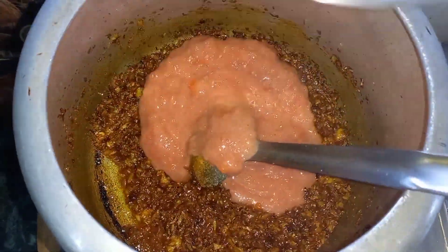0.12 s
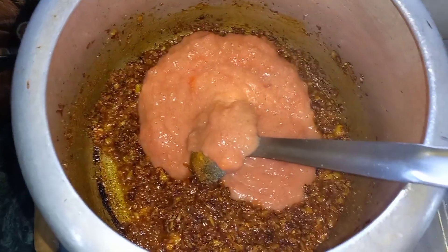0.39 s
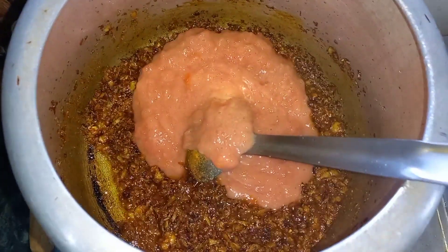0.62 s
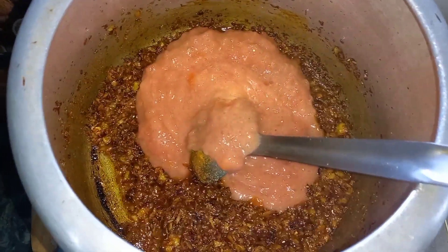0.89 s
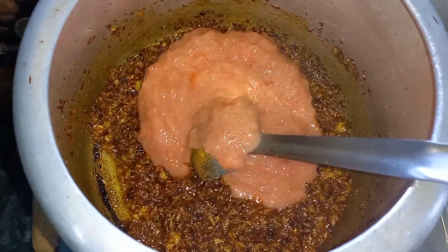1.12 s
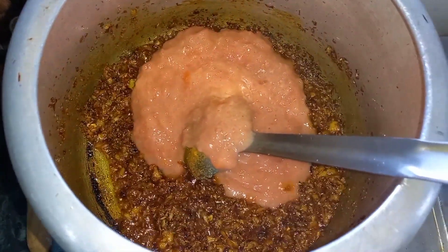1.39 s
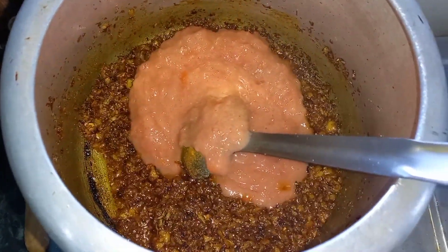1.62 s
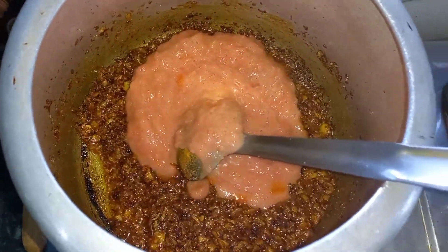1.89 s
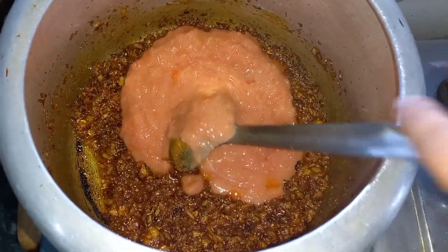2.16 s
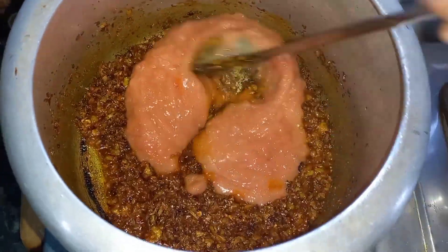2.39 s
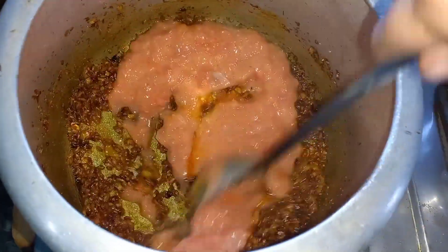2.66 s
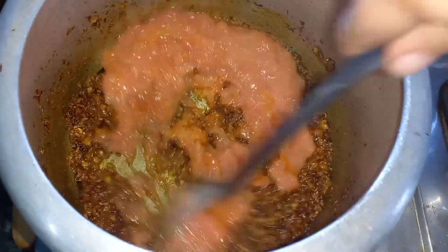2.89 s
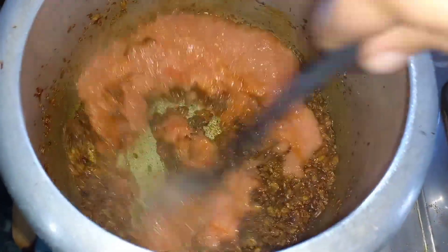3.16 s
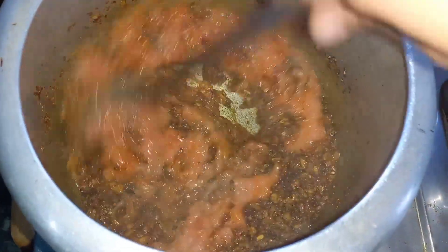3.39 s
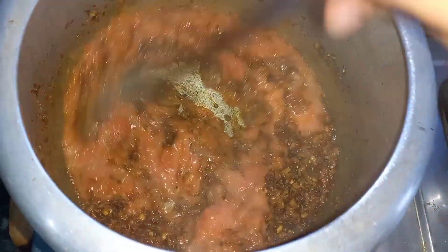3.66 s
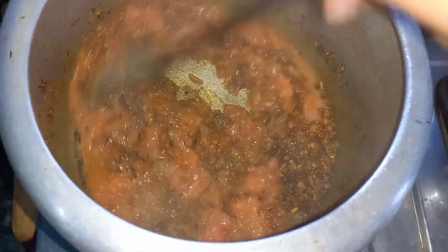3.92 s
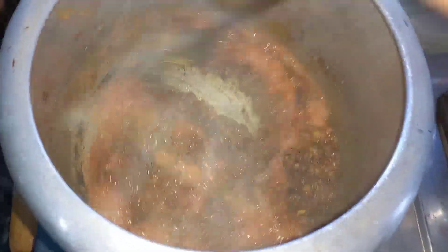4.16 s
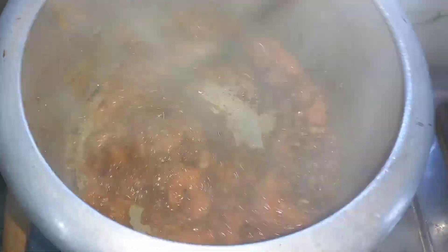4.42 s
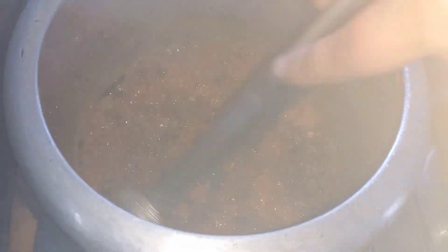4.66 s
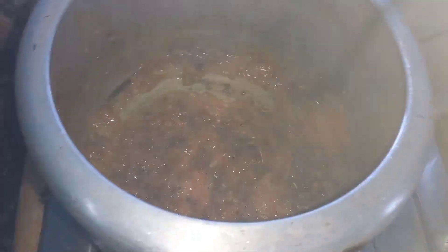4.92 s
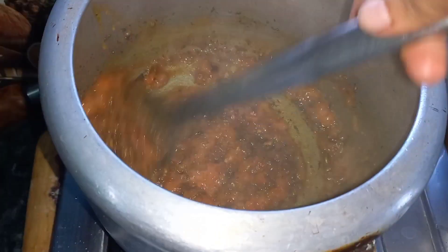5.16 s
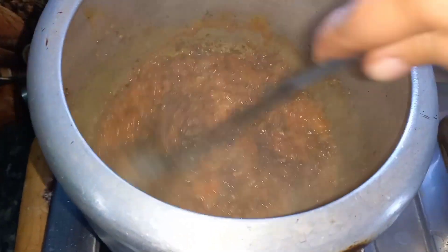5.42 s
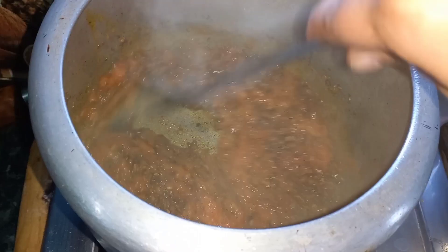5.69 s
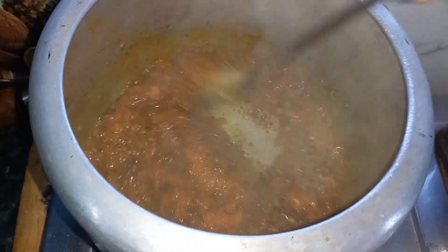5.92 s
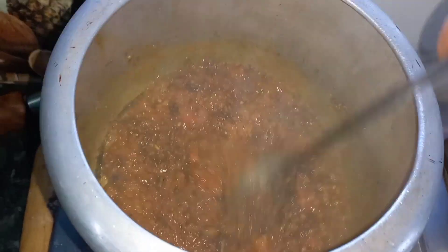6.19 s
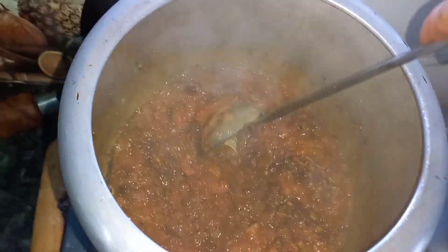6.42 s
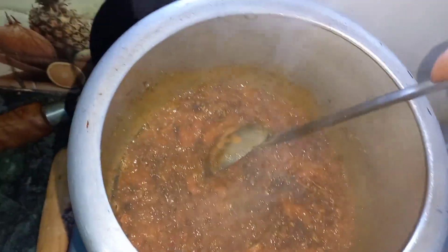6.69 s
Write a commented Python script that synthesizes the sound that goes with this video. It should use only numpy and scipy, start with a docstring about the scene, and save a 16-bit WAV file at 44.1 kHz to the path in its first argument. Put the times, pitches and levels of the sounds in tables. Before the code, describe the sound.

Close above a deep metal pot in a small kitchen, puree sizzles in hot oil with brisk crackle and bright, tiny spits. A bowl is set down nearby with a brief dull rattle. Then a spoon begins stirring: the sizzle jumps up, denser and smoother, with a few short knocks on the pot and hollow bubbling, easing slightly at the end. Handheld stereo microphone, the crisp treble leaning left.

```python
"""Tomato puree frying in a deep pot

Puree fries in hot oil; a spoon stirs it and the sizzle flares as wet food meets the hot base.
Steam bubbles are noise under flurries of random bursts, and spits are short snaps amid a spray of noise.
Larger bubbles are burst noise through the resonances of the pot; plops, a bowl set down nearby and
the spoon on the pot are struck modes with a crack, and a low rumble lies beneath.
Two microphone ports of a hand-held camera listen from above, the left one facing the pot."""
import sys
import numpy as np
from scipy import signal
from scipy.fft import rfft, irfft, next_fast_len
from scipy.io import wavfile
from scipy.ndimage import uniform_filter1d, map_coordinates

SR = 44100
rng = np.random.default_rng(int(sys.argv[2]) if len(sys.argv) > 2 else 0)


def master(y):
    """Save y as 16-bit WAV."""
    cut = np.clip(np.atleast_2d(y).T, -1, 1)
    pcm = np.round(cut * 32767)  # scale
    wavfile.write(sys.argv[1], SR, pcm.astype(np.int16))


def magnitude_from_level(level_db):
    """Linear magnitude for a level in decibels (20 dB per decade)."""
    exponent = np.asarray(level_db, float) / 20
    return 10 ** exponent


N = 300321  # samples

# Strength of the frying, gentle at rest and flaring once the spoon turns the puree under: time_s, fizz_db
SIZZLE_LEVEL = [(0.0, -31.5), (0.15, -30.5), (0.28, -31.5), (0.34, -33), (0.355, -31.5), (0.44, -36),
                (0.48, -34), (0.52, -30.5), (0.562, -36), (0.575, -36), (0.6, -28.5), (0.62, -34),
                (0.65, -34), (0.75, -35), (1.3, -33), (1.8, -31.5), (2.1, -31.5), (2.375, -32),
                (2.40, -32.5), (2.43, -26.5), (2.55, -26.5), (2.63, -28.5), (2.7, -25.5), (2.82, -27),
                (2.86, -23.5), (2.92, -25), (3.2, -27), (3.5, -25.5), (4.72, -28), (4.78, -30.5),
                (5.03, -30), (5.15, -27.5), (5.42, -28), (5.53, -30), (5.75, -27.5), (5.95, -28.5),
                (6.07, -27.5), (6.3, -31), (6.5, -30.5), (6.81, -34)]
# Balance of bubble sizes: time_s, fine_over_medium_db, coarse_over_medium_db
BUBBLE_SIZES = [(0.0, -4, 3.5), (0.565, 5.5, 8.5), (0.575, 3.5, 4.5), (1.5, 2.5, 3), (2.3, -2, 2),
                (2.6, -0.5, 2.5), (3.4, 2, 1.5), (4.4, 3, 4), (4.7, 3.5, 5.5), (5.7, 1.5, 4.5),
                (6.81, 4.5, 6)]
# Few bubbles stand out, a wet even boil smooths them: time_s, depth_factor
FLURRY_DEPTH = [(0, 0.66), (1, 0.72), (2.3, 0.98), (2.5, 0.28), (3.5, 0.43), (4.5, 0.35), (5.5, 0.34),
                (6.81, 0.32)]
# Spectrum of the tiny steam bubbles: frequency_hz, level_db (per Hz)
FIZZ_SPECTRUM = [(1500, -25.5), (2400, -13), (2850, -9), (3200, -6), (3600, -4.5), (4500, -3.5), (5000, -1),
                 (5450, 0), (5950, -0.5), (6400, -1.5), (7600, 4), (8200, 2.5), (8560, 6.5), (9000, 3),
                 (10500, 2.5), (12600, 4), (14500, 1.4), (15800, -1.5)]
# Aim of the camera: time_s, left_minus_right_db (added to the fizz),
# right_delay_ms (of hum, gurgle and rumble together)
CAMERA_AIM = [(0.0, -2, -0.05), (0.76, 2.5, -0.051), (1.82, -1, -0.057), (2.65, 5, 0.06), (4.2, 1.5, 0.11),
              (5.2, 1, -0.014), (5.8, 1, 0.023), (6.81, 0.5, -0.14)]

# Hum of the air in the pot: time_s, hum_db
HUM_LEVEL = [(0.0, -38), (0.36, -37.5), (0.5, -39.5), (1.3, -40), (1.75, -40.5), (2.3, -39.5),
             (2.47, -34.5), (2.6, -40), (2.84, -34), (2.92, -42), (3.4, -39.5), (4.3, -41.5), (4.73, -40.5),
             (4.78, -34.5), (4.85, -39.5), (4.93, -40), (5.05, -45), (5.11, -35.5), (5.17, -35),
             (5.24, -39.5), (6.2, -40.5), (6.81, -43)]
# Lowest resonances of the air in the pot: centre_hz, width_hz, level_db
CAVITY = [(306, 55.5, -8), (360.4, 37.4, -2.5), (443, 59.3, 1.5), (503, 105, -9.5)]
# Larger bubbles: time_s, level_db, low_db (added below the split)
GURGLE_LEVEL = [(0, -38, 0.5), (0.5, -39, 1), (0.62, -40.5, 0), (1.0, -39, 0), (1.4, -41, 0.5),
                (1.8, -41, 2), (2.37, -41.5, 0), (2.46, -35.5, -0.5), (2.62, -38, 0.5), (2.82, -34, -1),
                (2.93, -36.5, 0.5), (3.5, -35, -0.5), (4.6, -35.5, -1.5), (4.78, -37.5, 1),
                (4.86, -35.5, -7), (5.0, -36.5, 0), (5.27, -34.5, -4), (5.5, -37.5, -1), (5.95, -36, 0),
                (6.3, -38.5, -0.5), (6.81, -41.5, -3.5)]
# Higher pot resonances as the camera hears them before the stirring: centre_hz, width_hz, level_db
WALLS_RESTING = [(693, 400, -8), (1136, 19, 2.5), (1340, 740, -9), (1906, 88, 2.5), (2102, 71, 4.5),
                 (2410, 400, -3), (3430, 880, -4)]
# The same during the first strokes: centre_hz, width_hz, level_db
WALLS_STIRRED = [(690, 1270, -7), (1152, 43, 3.5), (1292, 154, -0.5), (1505, 570, 0), (1993, 290, 4),
                 (2580, 310, -0.5), (3480, 1400, -4.5)]
# The same late in the stirring: centre_hz, width_hz, level_db
WALLS_LATE = [(707, 200, -9), (1268, 78, 1), (1464, 53, -4.5), (2040, 310, 0), (2505, 170, 1.5),
              (3360, 900, -3)]
# Which of these three sets is heard, blending in between: time_s, set_number (0 to 2)
WALLS_VIEW = [(0, 0.12), (2.3, 0.094), (2.5, 1.06), (4.1, 0.94), (4.8, 1.77), (6.81, 1.53)]
# Rumble of the flame and of the hand on the camera: time_s, rumble_db
RUMBLE_LEVEL = [(0.0, -47.5), (0.4, -57), (1.12, -52), (1.27, -49.5), (1.42, -54.5), (2.15, -56.5),
                (2.5, -49), (2.66, -42.5), (2.85, -52), (2.93, -48), (2.98, -43), (3.03, -49), (3.6, -50),
                (4.55, -49), (4.63, -48), (4.7, -49), (4.85, -55.5), (5.45, -56.5), (6.0, -47),
                (6.3, -49.5), (6.55, -51), (6.81, -50.5)]
# Spectrum of that rumble: frequency_hz, level_db (per Hz)
RUMBLE_SPECTRUM = [(25, -43), (45, -27), (70, -7), (90, 2.5), (104, 4), (120, -2.5), (150, -4), (200, -5),
                   (280, -15.5), (400, -28), (700, -80)]

# The marked oil spits: start_s, left_level_db, left_minus_right_db, pitch_hz
MARKED_SPITS = [(0.4179, -9, 9, 11400), (0.4967, -6, 10, 9800), (0.5226, -8, 11, 11700),
                (0.5555, -10, 6, 6500), (0.5685, -7, 14, 11100), (0.5915, -6, 13, 11800),
                (0.6526, -7, 15, 11900), (1.2804, -9, 11, 11400), (1.4368, -9, 9, 11200),
                (1.6127, -9, 10, 10400), (1.815, -9, 10, 7000), (2.0334, -9, 11, 10900),
                (2.1008, -5, 16, 11500), (2.2662, -8, 13, 8500), (2.5264, -4, 11, 9400),
                (2.6796, -7, 13, 9800), (4.6821, -7, 10, 9300), (5.8347, -7, 11, 11500)]
# Mean of the lesser spits: left_level_db, left_minus_right_db, pitch_hz
SMALL_SPIT = (-12.5, 11, 11300)
# Random scatter around that mean: left_level_db, left_minus_right_db, pitch_hz
SMALL_SPIT_SCATTER = (1.2, 2.5, 1600)

# Touches of the bowl: start_s, level_db (before trim), thud_db
BOWL_BLOWS = [(1.158, -18, -2), (1.173, -28, 2), (1.185, -28, -4), (1.211, -21.5, -9), (1.222, -28, -1),
              (1.237, -21, -11), (1.247, -29, 0), (1.262, -32, 2), (1.292, -34, 1)]
# Modes of the bowl: pitch_hz, level_db, t60_s
BOWL_MODES = [(180, -7, .05), (300, -8, .04), (445, -9, .025), (600, -11, .04), (790, -8, .09),
              (1040, -9, .03), (1240, -9, .02), (1400, 0, .04), (1510, -2, .025), (1900, -12, .025),
              (2370, 0, .045)]
# Spoon against the pot: start_s, level_db (before trim), thud_db
SPOON_BLOWS = [(2.48, -27, 4.5), (2.694, -18, -9), (2.979, -19, -3), (3.515, -11, -20), (4.6805, -16, 3)]
# Modes of the loaded pot under a blow: pitch_hz, level_db, t60_s
POT_MODES = [(208, -3, 0.025), (393, 10, 0.015), (700, 1, 0.018), (842, -12, 0.12), (1230, 2.5, 0.02),
             (2300, -14, 0.03), (3150, -10, 0.015), (3700, -2, 0.03), (4200, -5, 0.018)]
# The first stroke rocks the pot on its stand: centre_s, level_db, spread_s
SHOVE = (2.67, -45.5, .06)
# Low tones of the stand: pitch_hz, level_db
STAND = [(106, 3), (146, -5)]
# Big bubbles burst and sound the air in the pot: start_s, level_db (before trim), thud_db
PLOP_BLOWS = [(3.957, -23, 1), (4.803, -23, -1), (4.868, -27, -1), (4.91, -24, 0)]
# Modes of that air: pitch_hz, level_db, t60_s
PLOP_MODES = [(366, -3, 0.033), (453, 0, 0.051)]

# How alike the two ports hear: frequency_hz, likeness (1 is identical)
PORT_LIKENESS = [(25, 0.21), (90, 1), (125, 1), (190, 0.61), (300, 1), (450, 0.87), (800, 0.63),
                 (1150, 0.36), (1500, 0.49), (2000, 0.29), (2400, 0.24), (3000, 0.073), (15000, 0.11)]
# Level difference of the ports: frequency_hz, left_minus_right_db
PORT_LEAN = [(60, 3), (100, 1), (160, 5.5), (270, 1.5), (450, 4), (740, 7), (1220, 0.5), (2010, 1),
             (3330, 3.5), (5300, 7.5), (6500, 10.5), (8500, 8), (10500, 5), (13000, 9), (15500, 12)]
# Phase by which the left port leads: frequency_hz, lead_rad
PORT_LEAD = [(60, 0.64), (430, 0.54), (800, 0.61), (1400, 0.074), (2000, 1.63), (3000, 1.7), (6000, 0)]


def along(points, hz):
    """Reads (frequency, value) points on a log frequency axis."""
    f, v = np.transpose(points)
    return np.interp(np.log(hz + 1), np.log(f + 1), v)


def curves(rows):
    """Draws one value per sample for each column after the time."""
    s, *columns = np.transpose(rows)
    return [np.interp(np.arange(N) / SR, s, column) for column in columns]


def filtered(x, response):
    """Multiplies the spectrum of x by a complex response of frequency."""
    m = next_fast_len(N + SR // 2)
    return irfft(rfft(x, m) * response(np.fft.rfftfreq(m, 1 / SR)), m)[..., :N]


def below(corner_hz, steepness):
    """A smooth low-pass response; a higher steepness falls faster."""
    return lambda hz: 1 / (1 + (hz / corner_hz) ** steepness)


def resonances(modes):
    """Causal response of damped resonators side by side, every second one inverted."""
    def response(f):
        total = 0
        for k, (centre, width, db) in enumerate(modes):
            damping = 1j * f * width
            total = total + (-1) ** k * magnitude_from_level(db) * damping / (centre ** 2 - f ** 2 + damping)
        return total
    return response


def throb(lo_hz, hi_hz, channels=1):
    """A random curve of rms 1 that swings lo to hi times a second."""
    def band(hz):
        return 1 / (1 + (lo_hz / (hz + 0.091)) ** 2) / (1 + (hz / hi_hz) ** 2)
    swing = filtered(rng.standard_normal((channels, N)), band)
    return swing / swing.std()


def patches(shape, bins, frames):
    """A random field of rms 1, smooth over so many frequency bins and time frames."""
    field = uniform_filter1d(rng.standard_normal(shape), size=bins, axis=0)
    field = uniform_filter1d(field, size=frames, axis=1)
    return field / field.std()


def bursts(per_s, spread_db, life_s, share):
    """Envelope of bubble bursts, sudden and dying fast, over a steady share; mean power 1."""
    size_db = spread_db * np.minimum(rng.exponential(size=N), 3)
    hits = (rng.random(N) < per_s / SR) * magnitude_from_level(size_db) ** 2
    power = signal.lfilter([1], [1, -np.exp(-1 / (life_s * SR))], hits)
    share = np.clip(share, 0, 1)
    return np.sqrt(1 - share + share * power / power.mean())


def ports(envelope, response, patchy_db, notes_db):
    """Patchy noise under an envelope as two partly alike ports hear it; their mean has rms 1."""
    z = signal.stft(rng.standard_normal((2, N + 512)), nperseg=512)[2]
    shape = z.shape[1:]
    gain_db = patchy_db * patches(shape, bins=30, frames=4)  # broad patches
    gain_db = gain_db + notes_db * patches(shape, bins=2, frames=4)  # brief bubble notes
    # echoes off the pot walls draw peaks and dips that drift as the camera moves
    gain_db = gain_db + 1.1 * patches(shape, bins=3, frames=70)
    pair = envelope * signal.istft(z * magnitude_from_level(gain_db), nperseg=512)[1][:, :N]

    def spread(hz):
        turn = np.arccos(np.clip(along(PORT_LIKENESS, hz), -1, 1)) / 2
        return [np.cos(turn), np.sin(turn)]

    def lean(hz):
        level = magnitude_from_level(np.outer([.5, -.5], along(PORT_LEAN, hz)))
        return level * np.exp(1j * np.outer([.5, -.5], along(PORT_LEAD, hz)))

    mid, side = filtered(pair, spread)
    out = filtered(np.array([mid + side, mid - side]), lambda hz: response(hz) * lean(hz))
    return out / out.mean(axis=0).std()


def fizz_colour(hz):
    """Spectrum of the tiny steam bubbles, shared by the sizzle and the spray."""
    return magnitude_from_level(along(FIZZ_SPECTRUM, hz))


def sizzle():
    """Steam bubbles burst through the oil in flurries; medium, fine and coarse ones swing on their own."""
    fizz_db, = curves(SIZZLE_LEVEL)
    fine_db, coarse_db = curves(BUBBLE_SIZES)
    aim_db, _ = curves(CAMERA_AIM)
    depth, = curves(FLURRY_DEPTH)
    flurry = magnitude_from_level(1.5 * depth * throb(20, 21) + 0.3 * throb(3.3, 5.5))
    envelope = flurry * bursts(900, spread_db=-1.5, life_s=0.0017, share=0.31)
    fizz = ports(envelope, fizz_colour, patchy_db=1.25, notes_db=1.5)
    # each port faces other bubbles
    fizz = fizz * magnitude_from_level(0.59 * throb(12.0, 28, channels=2) + np.outer([.5, -.5], aim_db))
    fine = filtered(fizz, lambda hz: 1 / (1 + (10800 / (hz + 1)) ** 8))
    coarse = filtered(fizz, below(6700, 8))
    medium = fizz - fine - coarse
    own = magnitude_from_level(1.25 * depth * throb(24, 30, channels=3))
    mix = medium * own[0] + fine * own[1] * magnitude_from_level(fine_db) + coarse * own[2] * magnitude_from_level(coarse_db)
    return magnitude_from_level(fizz_db) * mix


def hum():
    """Bubble bursts set the lowest resonances of the air in the pot sounding."""
    def cavity(hz):
        return resonances(CAVITY)(hz) * hz / (hz + 200) * below(800, 4)(hz)
    level_db, = curves(HUM_LEVEL)
    envelope = magnitude_from_level(0.66 * throb(9.1, 10)) * bursts(70, spread_db=-2, life_s=0.0026, share=0.23)
    return magnitude_from_level(level_db) * ports(envelope, cavity, patchy_db=0.0, notes_db=-1.3)


def gurgle():
    """Larger bubbles excite the higher pot resonances, which pass from one set to the next."""
    split_hz = 1150
    level_db, low_db = curves(GURGLE_LEVEL)
    view, = curves(WALLS_VIEW)
    bubbles = magnitude_from_level(0.32 * throb(1.5, 7.8)) * bursts(150, spread_db=3.0, life_s=0.0055, share=0.25)
    mix = 0
    for k, walls in enumerate([WALLS_RESTING, WALLS_STIRRED, WALLS_LATE]):
        fade = np.clip(1 - abs(view - k), 0, 1) ** .5
        mix = mix + fade * ports(bubbles, resonances(walls), patchy_db=1.0, notes_db=2.0)
    mix = mix + (magnitude_from_level(low_db) - 1) * filtered(mix, below(split_hz, 12))
    return magnitude_from_level(level_db) * mix


def rumble():
    """The flame and the hand on the camera rumble: low noise that swells unsteadily."""
    level_db, = curves(RUMBLE_LEVEL)
    noise = ports(magnitude_from_level(0.7 * throb(4.1, 7.3)), lambda hz: magnitude_from_level(along(RUMBLE_SPECTRUM, hz)),
                  patchy_db=1.0, notes_db=2.3)
    return magnitude_from_level(level_db) * noise


def simmer():
    """Hum, gurgle and rumble together, the right port shifted in time as the camera's aim drifts."""
    left, right = hum() + gurgle() + rumble()
    late = curves(CAMERA_AIM)[1] * SR / 1000  # ms to samples
    return np.array([left, map_coordinates(right, [np.arange(N) - late], mode="nearest")])


def small_spits():
    """Lesser spits at random times, louder when the fizz is above its opening level."""
    per_s, follow = 9, 0.35  # follow: dB gained for each dB of fizz
    count = round(per_s * N / SR)
    start_s = rng.random(count) * N / SR
    traits = np.array(SMALL_SPIT) + np.array(SMALL_SPIT_SCATTER) * rng.standard_normal((count, 3))
    fizz_db = np.interp(start_s, *np.transpose(SIZZLE_LEVEL))
    traits[:, 0] += follow * (fizz_db - SIZZLE_LEVEL[0][1])
    return np.column_stack([start_s, traits])


def spits():
    """Drops of water explode in the oil: a snap of about two cycles amid a short spray of noise."""
    half = SR // 50  # samples on either side of the snap
    t = np.arange(-half, half) / SR
    snaps, spray = np.zeros((2, N + SR)), np.zeros((2, N + SR))
    snap_shape = .85 * np.exp(-(t / .00009) ** 2)
    spray_shape = magnitude_from_level(-17) * np.exp(-np.abs(t - .002) / 0.0018)
    for s, db, pan_db, hz in np.vstack([MARKED_SPITS, small_spits()]):
        at = round(s * SR)
        size = magnitude_from_level([[db], [db - pan_db]])
        snaps[:, at:at + len(t)] += size * snap_shape * np.cos(2 * np.pi * hz * t)
        spray[:, at:at + len(t)] += size * spray_shape * rng.standard_normal((2, len(t)))
    return snaps[:, half:][:, :N] + filtered(spray[:, half:][:, :N], fizz_colour)


def knocks(blows, modes, level_db, crack_db, crack_s, size):
    """Blows crack and ring decaying modes, roughened by rattling; thud favours crack and low modes."""
    t, out = np.arange(SR // 4) / SR, np.zeros(N + SR)
    detune = .006  # each blow lands elsewhere and shifts the modes by about this share
    contact = 1 - np.exp(-t / .0006)
    for s, db, thud_db in blows:
        noise = uniform_filter1d(rng.standard_normal(len(t)), size=size)
        sound = noise * magnitude_from_level(crack_db + thud_db - 60 * t / crack_s)
        for hz, mode_db, t60 in modes:
            chance_db, shift = rng.standard_normal(2)
            low_db = thud_db if hz < 1700 else 0
            decay = magnitude_from_level(mode_db + low_db + chance_db - 60 * t / t60)
            sound = sound + decay * np.sin(2 * np.pi * hz * (1 + detune * shift) * t)
        out[round(s * SR):][:len(t)] += magnitude_from_level(db + level_db) * contact * sound
    rattle = magnitude_from_level(1.6 * throb(40, 200)[0])
    # small objects radiate no bass
    return filtered(out[:N] * rattle, lambda hz: (1j * hz / (1j * hz + 120)) ** 2)


def bowl_set_down():
    """A bowl rattles as it is set down: short modes under a dull crack."""
    return knocks(BOWL_BLOWS, BOWL_MODES, level_db=-4, crack_db=2, crack_s=.08, size=16)


def kitchen(x):
    """A short diffuse answer of the room: decaying noise, different at each port."""
    t60_s = .2
    t = np.arange(SR // 3) / SR
    tail = rng.standard_normal((2, len(t))) * magnitude_from_level(-60 * t / t60_s)
    tail = tail / np.linalg.norm(tail[0])
    delayed = np.pad(x, (200, 0))[None]
    return signal.fftconvolve(delayed, tail, axes=1)[:, :N]


def spoon_knocks():
    """The spoon strikes the loaded pot, whose modes die quickly after a bright crack."""
    return knocks(SPOON_BLOWS, POT_MODES, level_db=-11, crack_db=3, crack_s=.025, size=4)


def shove():
    """A soft low push of the stand's tones, swelling and fading as the spoon drags the pot."""
    s, db, spread_s = SHOVE
    t = np.arange(N) / SR
    swell = magnitude_from_level(db) * np.exp(-((t - s) / spread_s) ** 2 / 2)
    tones = 0
    for hz, mode_db in STAND:
        tones = tones + magnitude_from_level(mode_db) * 2 ** .5 * np.sin(2 * np.pi * (hz * t + rng.random()))
    return swell * tones


def plops():
    """Big bubbles burst and ring two modes of the air in the pot."""
    return knocks(PLOP_BLOWS, PLOP_MODES, level_db=-3, crack_db=-6, crack_s=.01, size=20)


def scene():
    """Frying, spits and knocks; the bowl stands further off, deeper in the room."""
    frying = sizzle() + simmer() + spits()
    bowl, spoon = bowl_set_down(), spoon_knocks()
    room = kitchen(magnitude_from_level(-8) * bowl + magnitude_from_level(-16) * spoon)
    struck = (bowl + spoon + plops()) * magnitude_from_level([[1.2], [-1.2]])  # leans to the left port
    return frying + struck + shove() + room


def roll_off(x):
    """The treble ends steeply here."""
    return signal.sosfilt(signal.butter(12, 17070, fs=SR, output="sos"), x)


def record(dry):
    """The camera keeps nothing above its band limit."""
    top_hz = 15740
    mix = filtered(dry, lambda hz: hz < top_hz)
    return roll_off(mix)


dry = scene()
out = record(dry)
master(out)
```